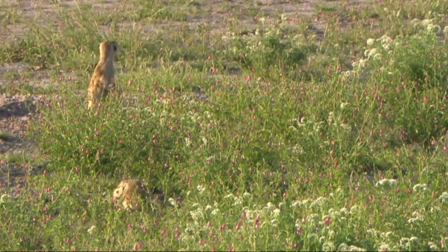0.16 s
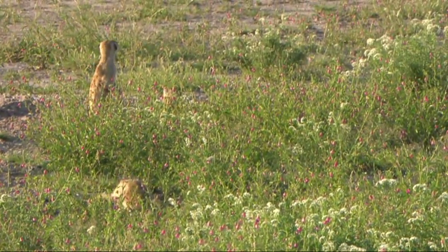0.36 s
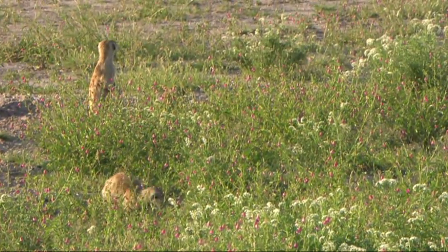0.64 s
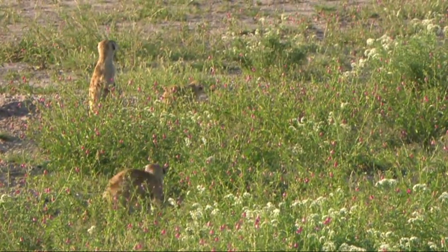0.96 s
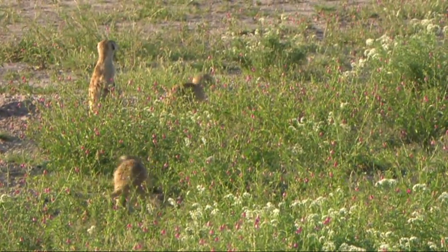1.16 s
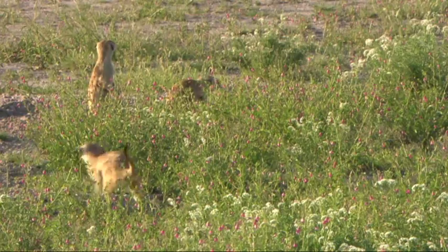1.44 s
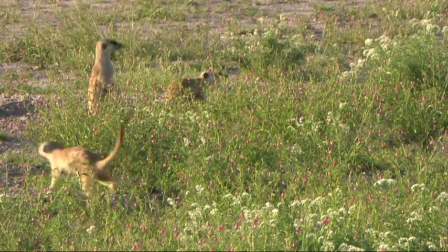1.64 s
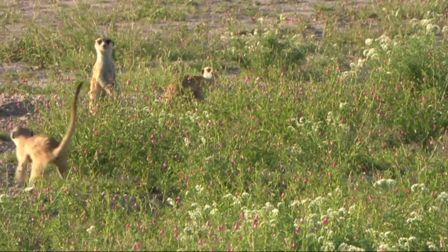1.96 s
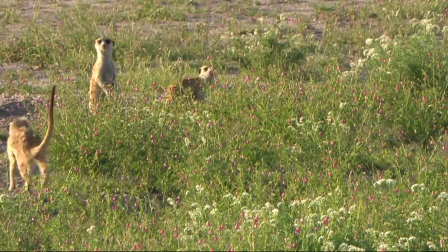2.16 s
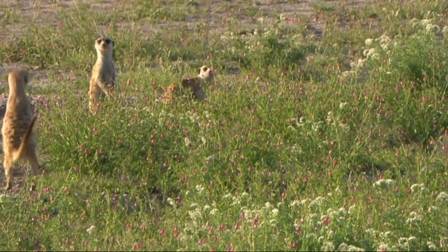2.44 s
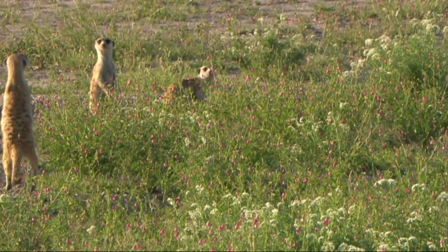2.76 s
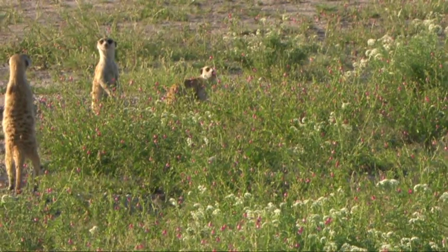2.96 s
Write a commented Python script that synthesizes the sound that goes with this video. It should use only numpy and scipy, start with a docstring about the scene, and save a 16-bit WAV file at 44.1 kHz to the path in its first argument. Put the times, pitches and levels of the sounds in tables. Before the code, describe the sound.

Meerkat barks, harsh and fluttering, start immediately with a short clipped yap at 0 s. Longer barks follow at about 0.25, 0.6 and 0.95 s, each growing from a buzzing growl into a rasp and squeak; a duller bark and small squeaks overlap around 0.4-0.7 s. Faint whines precede a weak bark at 1.8 s. A soft knock lands near 2.4 s. Low wind rumble and a faint hum continue to 3 s.

```python
"""Meerkats bark in open grassland, over a low wind rumble, a soft rush and a faint far hum.
Most barks open as a low buzzing growl, summed from harmonics shaped by the mouth. Each then leaps to a harsh
rasp, in which harmonic tone and resonant noise alternate some 40 to 100 times a second, and ends in a clean
falling squeak. The wind is filtered noise and the hum a few wavering sines. Thin whines glide by,
and later something knocks softly once, as a set of decaying modes."""
import sys
import numpy as np
from scipy import signal
from scipy.fft import rfft, irfft, next_fast_len
from scipy.io import wavfile
from scipy.ndimage import map_coordinates

SR = 44100
rng = np.random.default_rng(int(sys.argv[2]) if len(sys.argv) > 2 else 0)


def master(y):
    """Save y as 16-bit WAV."""
    cut = np.clip(np.atleast_2d(y).T, -1, 1)
    pcm = np.round(cut * 32767)  # scale
    wavfile.write(sys.argv[1], SR, pcm.astype(np.int16))


N = 136710  # length in samples

# Voice contours of the main barks; the first has no growl before it.
# Columns: time_s, pitch_hz, level_db, roughness (limited to 0-1), flutter_hz
BARK_A = [(0, 1383, -38, 1.06, 74), (.033, 1384, -34.5, 0.43, 100), (.051, 1379, -32, 0.1, 96),
          (.056, 1610, -37, .6, 76), (.061, 1730, -36, .25, 92), (.069, 1610, -40.5, 0.14, 92),
          (.076, 1390, -47, .05, 92)]
BARK_B = [(.283, 979, -49, 0.84, 52), (.305, 1095, -45.5, 1, 51.2), (.328, 1293, -41.5, 1, 82.4),
          (.392, 1339, -37, 0.84, 90.2), (.45, 1364, -34.5, 0.46, 77.5), (.462, 1376, -34.5, .1, 70),
          (.47, 1340, -31.5, 0.049, 70), (.475, 1315, -43.5, .05, 70), (.481, 1190, -46, .05, 70)]
BARK_C = [(.652, 1200, -43.5, 1, 44), (.675, 1276, -38, 0.703, 59.6), (.71, 1345, -38.5, 0.85, 69.2),
          (.745, 1318, -40, .7, 77.5), (.776, 1320, -41.5, 0.97, 67), (.804, 1385, -34, 0.44, 70),
          (.814, 1456, -37, 1, 70.5), (.82, 1700, -37, .35, 70), (.831, 1600, -39, .05, 70)]
BARK_D = [(1.006, 1231, -41.5, 0.98, 52.2), (1.06, 1270, -39.5, 0.98, 50.2), (1.103, 1323, -38, 0.75, 39),
          (1.132, 1361, -35.5, 0.88, 82.5), (1.186, 1407, -35, 0.88, 85.6), (1.199, 1414, -30, 0.32, 84),
          (1.209, 1438, -28, .08, 84), (1.219, 1326, -33.5, .03, 84), (1.226, 1234, -48, .03, 84)]
BARK_E = [(1.819, 1130, -61, 0.95, 47.6), (1.84, 1250, -54.5, 1, 69), (1.862, 1324, -52.5, 0.96, 90),
          (1.883, 1426, -47.5, 1, 101), (1.893, 1408, -45.5, 0.11, 100), (1.905, 1287, -49.5, .05, 100),
          (1.912, 1180, -57, .3, 102), (1.922, 970, -54, .1, 100)]
# A duller bark and two overlapping squeaks from other animals, same columns
FAR_BARK = [(.484, 1188, -55, 1, 57.6), (.503, 1205, -47, 0.83, 60), (.511, 1223, -53, 1, 64),
            (.518, 1227, -44, 0.68, 68.5), (.545, 1277, -50.5, 1, 80), (.583, 1285, -44, 0.94, 76),
            (.61, 1297, -59, 1, 76.5), (.65, 1320, -47, 1, 74)]
SQUEAK_A = [(.421, 1420, -46, .3, 80), (.429, 1414, -46, .2, 80), (.438, 1305, -44, 0.17, 80),
            (.446, 1210, -58, .3, 80)]
SQUEAK_B = [(.678, 1350, -52, 0.83, 71.6), (.692, 1403, -47.5, 0.72, 68), (.709, 1419, -44, 0.25, 70),
            (.72, 1375, -45, .1, 70.2), (.734, 1160, -53, .2, 70)]
# Each call with its balance and its colour as the animal faces. Columns: contour, relative_noise_db,
# flutter_pitch_fall (share), then colour_db at 1400 Hz, 4200 Hz, 7000 Hz and 12000 Hz
CALLERS = [(BARK_A, -6.5, 0.034, 3.1, 0, 1, -1), (BARK_B, -4, 0.039, 0, 0, 0.8, 0),
           (BARK_C, -4, .035, 1, 1, -3.5, -1), (BARK_D, -5.5, .04, -0.54, -0.86, -4, 3.5),
           (BARK_E, -7, 0.056, -13, 5.5, 12.5, -8), (FAR_BARK, -9, .1, -12, -12, -10, -16),
           (SQUEAK_A, -10, .03, -14, 3.2, 15, -6), (SQUEAK_B, -8, 0.041, -18, 11, 12, -13)]
# Throat and mouth resonances for the tone, and for the hoarse noise. Columns: frequency_hz, relative_level_db
THROAT = [(400, -40), (700, -14), (1100, -9.5), (1380, -13.5), (1750, -10), (2150, 1.5), (2750, -1),
          (3400, -6), (4050, -16), (4600, -18.5), (5350, -13.5), (6200, -37.5), (6950, -23.5),
          (7600, -27.5), (8250, -30), (9500, -39.5), (15000, -45)]
HOARSE = [(400, -45), (800, -19.5), (1200, -2), (1600, -11.5), (2200, -3.5), (2750, -3), (3450, 3),
          (3950, -8.5), (4500, -13), (5200, -13), (6100, -31.5), (7000, -20.5), (8200, -30.5),
          (9300, -36.5), (15000, -44.5)]
# Opening growls. Columns: start_s, length_s, first_pitch_hz, last_pitch_hz, first_level_db, last_level_db,
# roughness (0-1), lowest_harmonics_db
GROWLS = [(0.226, .009, 588, 653, -57.5, -54.5, 0.3, 11.5), (.235, .045, 695, 742, -47, -43.5, 0.1, 0.5),
          (0.281, 0.021, 753, 846, -45.5, -49, .7, 3), (0.586, 0.0335, 735, 776, -47, -39.5, 0.63, -2),
          (.622, 0.029, 818, 795, -38.5, -44.5, 0.5, -2), (0.645, 0.0177, 814, 964, -45, -42.5, 1, -3),
          (0.945, 0.013, 596, 690, -56, -46, 0.36, 4.5), (.957, 0.019, 704, 720, -42, -42, 0.12, -3),
          (0.976, .018, 815, 753, -38, -39, 0.3, -3), (0.996, 0.023, 826, 910, -50, -47.5, 0.76, 8),
          (1.794, 0.032, 735, 757, -56.5, -55, 0.46, -14)]
# Resonances of the half-closed mouth in a growl. Columns: frequency_hz, relative_level_db
GROWL_THROAT = [(450, -30), (730, -18.5), (1450, -10), (2200, -4), (2900, -9), (3600, -20.5), (4300, -25.5),
                (5000, -23.5), (6000, -47), (7100, -39), (9000, -48)]
# Power spectrum of the wind. Columns: frequency_hz, relative_density_db (per Hz)
WIND_SPECTRUM = [(12, -30), (20, -7), (49, 1), (133, -5), (161, -9.5), (232, -8.5), (298, -11.5),
                 (342, -10), (372, -13.5), (491, -16), (906, -29.5), (2270, -33.5), (2760, -37),
                 (3640, -40.5), (5380, -43.5), (6020, -44), (6910, -45), (8640, -46), (15500, -46)]
# Slow swell of the wind. Columns: time_s, rumble_db, rush_db
WIND_LEVEL = [(0, -55, -53.5), (1.0, -55, -53), (1.7, -51.5, -52.5), (2.2, -53.5, -53), (2.7, -53.5, -52.5),
              (3.1, -51, -53)]
# Low tones of the far hum. Columns: frequency_hz, relative_level_db
HUM_TONES = [(93, -62), (139, -63), (183, -72), (345, -70)]
# Faint thin whines before the last bark. Columns: start_s, length_s, first_pitch_hz, last_pitch_hz, level_db
WHINES = [(1.667, 0.056, 1440, 1474, -67), (1.768, 0.026, 1730, 2030, -64)]
# Modes with which the knock rings. Columns: frequency_hz, level_db (before the onset), t60_s
KNOCK_MODES = [(245, -44, 0.15), (328, -46.5, 0.1), (650, -52, 0.04), (1100, -51.5, 0.035),
               (1390, -48, 0.02), (1660, -47.5, .014), (3030, -58, 0.013)]

EDGE_S = 0.004  # fade at each end of a call
MOUTH_HZ = 2560  # main mouth resonance
JITTER = 0.023  # scale of the random pitch scatter in a bark (share)
HOARSE_PITCH_HZ, HOARSE_FOLLOWS = 1356, 0.8  # the noise slides from this pitch, by this power of the pitch
FLUTTER_DIP_DB, NOISE_SWING_DB = 23.5, 1.5  # between bursts: fall of the tone, swell of the noise
FLUTTER_DULL_DB, FLUTTER_SLIP = 5.5, 0.025  # treble lost between bursts; timing scatter (cycles)
BRIGHT_DB_PER_DB, DULLEST_DB = 0.25, -17  # treble lost per dB still to climb to the peak; its limit
GROWL_NOISE_DB, GROWL_JITTER = -9, 0.041  # noise and pitch scatter (share) of a fully rough growl
THROAT_SMEAR = 0.4  # spreads each growl pulse in time (radians per squared harmonic number)
RUMBLE_HZ, RUSH_HZ, HISS_DB = 107, 609, -65  # upper edges of rumble and rush; level of the hiss above
FIELD_ECHO_DB, FIELD_T60_S = -23, 0.23
KNOCK_S, KNOCK_RISE_S = 2.3635, 0.00089  # start; time constant of the onset
TOP_HZ = 15750  # band limit


def amp(db):
    """Decibels express the logarithm of an amplitude ratio; this gives the ratio."""
    return 10 ** (np.asarray(db) / 20)


def unit(x):
    """Root-mean-square normalisation: x at rms 1."""
    return x / np.sqrt(np.mean(x ** 2) + 1e-20)


def along(points, hz):
    """A spectral envelope, (Hz, value) points joined on a logarithmic frequency axis."""
    f, v = np.transpose(points)
    return np.interp(np.log(hz + 1), np.log(f + 1), v)


def wobble(rate, size):
    """Smooth random modulation: random knots, rate of them a second, joined by a spline."""
    return map_coordinates(rng.standard_normal(4096), [np.arange(size) * rate / SR + 2], mode="wrap")


def noise(gain_db, size):
    """Spectral shaping: white noise weighted by a dB function of frequency, at rms 1."""
    m = next_fast_len(size + 8192)
    spectrum = rfft(rng.standard_normal(m)) * amp(gain_db(np.fft.rfftfreq(m, 1 / SR)))
    return unit(irfft(spectrum, m)[:size])


def lowpass(x, hz):
    """Zero-phase low-pass: filtering forwards and backwards cancels the delay."""
    return signal.sosfiltfilt(signal.butter(2, min(hz, 20000), fs=SR, output="sos"), x)


def span(start, end):
    """Windowing: sample indices of a sound, their times, and a gate with squared-sine edges."""
    i = np.arange(max(0, int((start - .012) * SR)), int((end + .012) * SR))
    t = i / SR
    ramp = np.clip(np.minimum(t - start, end - t) / EDGE_S + .5, 0, 1)
    return i, t, np.sin(np.pi / 2 * ramp) ** 2


def bark(rows, noise_db, sag, low_db, mid_db, high_db, top_db):
    """Source and filter: a rough voice flutters between falling tone bursts and noise, then clears."""
    s, *cols = np.transpose(rows)
    i, t, gate = span(s[0] - EDGE_S, s[-1])
    pitch, level_db, rough, rate = [np.interp(t, s, c) for c in cols]
    rough = np.clip(rough, 0, 1)
    colour = [(1400, low_db), (MOUTH_HZ, 0), (4200, mid_db), (7000, high_db), (12000, top_db)]
    facing = lambda hz: along(colour, hz)

    # broken is 0 in a tone burst and reaches the roughness midway between two
    cycle = 2 * np.pi * (np.cumsum(rate * (t > s[0])) / SR + FLUTTER_SLIP * wobble(54.5, len(t)))
    broken = rough * (1 - np.cos(cycle)) / 2

    # reading the noise faster or slower slides its resonances with the pitch
    slide = np.cumsum((pitch / HOARSE_PITCH_HZ) ** HOARSE_FOLLOWS)
    hoarse = map_coordinates(noise(lambda hz: along(HOARSE, hz) + facing(hz), 2 * len(t)), [slide])
    hoarse_db = noise_db - 3.5 + NOISE_SWING_DB * broken + 0.76 * wobble(404, len(t))
    hoarse = hoarse * rough * amp(hoarse_db)

    scatter = JITTER * (rough / 2 + 2 * broken + 0.14) * wobble(1400, len(t))
    pitch = pitch * (1 - sag * rough * np.sin(cycle) - .02 * broken + scatter)
    phase = 2 * np.pi * np.cumsum(pitch) / SR
    harmonic_gain = lambda hz: amp(along(THROAT, hz) + facing(hz))
    tone = -sum(harmonic_gain(k * pitch) * np.cos(k * phase) for k in range(1, 13))
    tone_db = -FLUTTER_DIP_DB * broken ** 1.3 + 1.14 * rough * wobble(505, len(t))
    sound = hoarse + tone * amp(tone_db)

    # the voice brightens with effort, up to its loudest moment, and stays bright
    effort_db = np.maximum.accumulate(level_db) - level_db.max()
    treble_db = np.maximum(BRIGHT_DB_PER_DB * effort_db, DULLEST_DB) + 3.5 - FLUTTER_DULL_DB * broken
    dull = lowpass(sound, 4700)
    sound = dull + (sound - dull) * amp(treble_db)
    return np.bincount(i, gate * amp(level_db) * sound, N)


def field(x):
    """Diffuse scattering from bushes and ground: convolution with decaying, low-passed noise."""
    t = np.arange(SR // 2) / SR
    tail = rng.standard_normal(len(t)) * amp(-60 * t / FIELD_T60_S) * (t > .008)
    tail = signal.sosfilt(signal.butter(2, 4500, fs=SR, output="sos"), tail / np.linalg.norm(tail))
    return signal.fftconvolve(x, tail)[:N]


def wind():
    """Broadband noise in bands: rumble and rush swell separately under a thin steady hiss."""
    s, rumble_db, rush_db = np.transpose(WIND_LEVEL)
    level = lambda db: amp(np.interp(np.arange(N) / SR, s, db))

    def layer(lo, hi):
        """Band limitation: the wind spectrum with steep slopes below lo and above hi (Hz)."""
        slopes = lambda hz: (1 + (lo / (hz + 1)) ** 8) * (1 + (hz / hi) ** 8)
        return noise(lambda hz: along(WIND_SPECTRUM, hz) - 10 * np.log10(slopes(hz)), N)

    rumble = level(rumble_db) * layer(0, RUMBLE_HZ)
    rush = level(rush_db) * layer(RUMBLE_HZ, RUSH_HZ)
    hiss = amp(HISS_DB) * layer(RUSH_HZ, SR)
    return rumble + rush + hiss


def hum():
    """Additive synthesis: faint low sines with slow random modulation of amplitude and phase."""
    t = np.arange(N) / SR
    out = np.zeros(N)
    for hz, db in HUM_TONES:
        level = amp(db + 2.5 + 1.7 * wobble(4.04, N))
        out += level * np.sin(2 * np.pi * hz * t + 0.83 * wobble(7, N))
    return out


def growls():
    """Harmonic voice through a half-closed mouth: roughness adds noise, pitch and level scatter."""
    out = np.zeros(N)
    for start, length, first_hz, last_hz, first_db, last_db, rough, low_db in GROWLS:
        i, t, gate = span(start, start + length)
        glide = lambda a, b: np.interp(t, [start, start + length], [a, b])
        pitch = glide(first_hz, last_hz) * (1 + GROWL_JITTER * rough * wobble(590, len(t)))
        phase = 2 * np.pi * np.cumsum(pitch) / SR
        mouth = lambda hz: along(GROWL_THROAT, hz) + along([(1500, low_db), (2100, 0)], hz)
        buzz = sum(amp(mouth(k * pitch)) * np.cos(k * phase + THROAT_SMEAR * k * k) for k in range(1, 12))
        hoarse = rough * amp(GROWL_NOISE_DB) * noise(mouth, len(t))
        level_db = glide(first_db, last_db) + 1.6 * rough * wobble(253, len(t))
        out[i] += gate * amp(level_db) * (buzz + hoarse)
    return out


def whines():
    """Frequency modulation: thin single sines whose pitch glides and trembles."""
    out = np.zeros(N)
    for start, length, first_hz, last_hz, db in WHINES:
        i, t, gate = span(start, start + length)
        pitch = np.interp(t, [start, start + length], [first_hz, last_hz])
        pitch = pitch * (1 + .022 * wobble(300, len(t)))
        out[i] += gate * amp(db) * np.sin(2 * np.pi * np.cumsum(pitch) / SR)
    return out


def knock():
    """Modal decay: one soft knock rings in damped modes, with a brief scuff of noise."""
    t = np.maximum(np.arange(N) / SR - KNOCK_S, 0)
    ring = sum(amp(db - 60 * t / t60) * np.sin(2 * np.pi * hz * t) for hz, db, t60 in KNOCK_MODES)
    scuff_colour = [(200, 1), (1600, 3), (3500, -18), (7000, -37.5)]  # (Hz, dB)
    scuff = amp(-49.5 - 60 * t / 0.063) * noise(lambda hz: along(scuff_colour, hz), N)
    return (ring + scuff) * (1 - np.exp(-t / KNOCK_RISE_S))


def scene():
    """Superposition: the calls and their scatter, the wind, the hum and the knock add linearly."""
    calls = growls() + whines() + sum(bark(*row) for row in CALLERS)
    return (calls + amp(FIELD_ECHO_DB) * field(calls) + wind() + hum() + knock())[None]


def record(dry):
    """Band limitation: every component at or above the limit is removed from the spectrum."""
    m = next_fast_len(N + 8192)
    passed = np.fft.rfftfreq(m, 1 / SR) < TOP_HZ
    return irfft(rfft(dry, m) * passed, m)[..., :N]


dry = scene()
out = record(dry)
master(out)
```